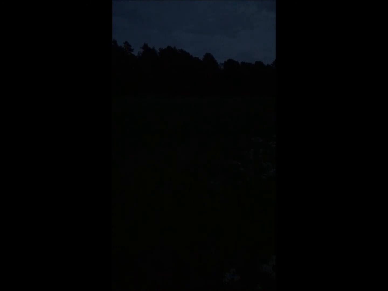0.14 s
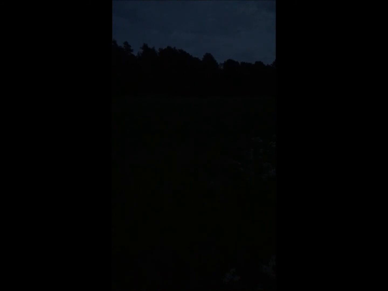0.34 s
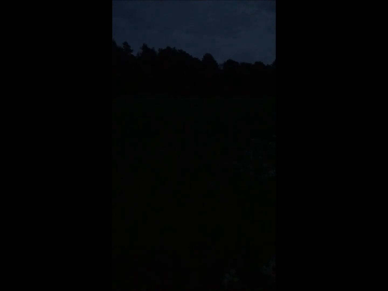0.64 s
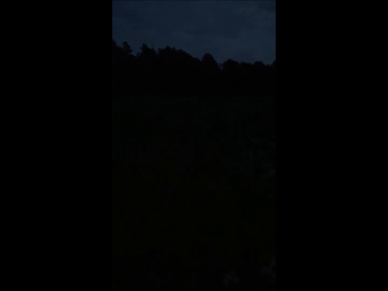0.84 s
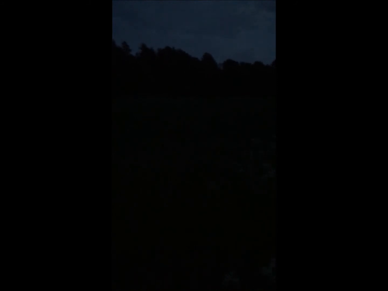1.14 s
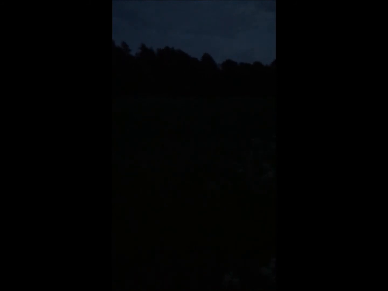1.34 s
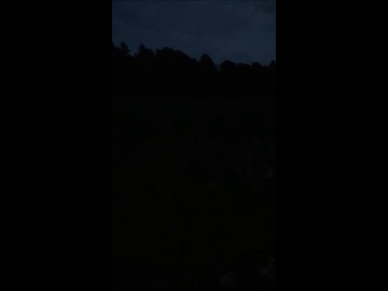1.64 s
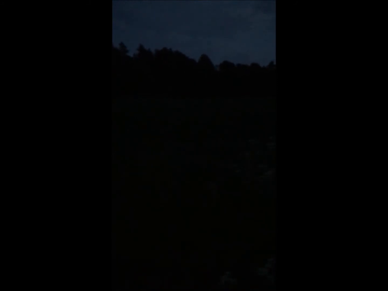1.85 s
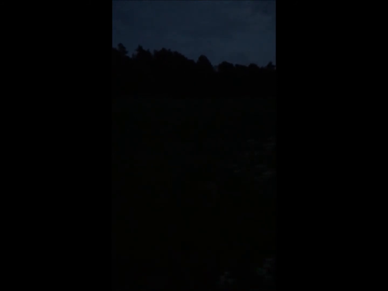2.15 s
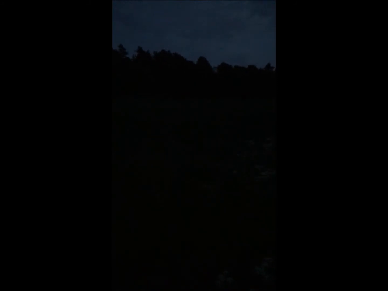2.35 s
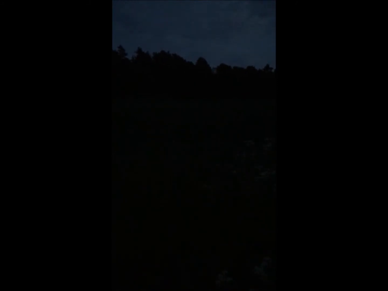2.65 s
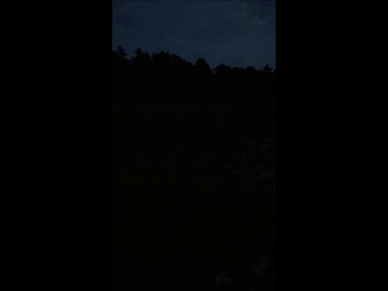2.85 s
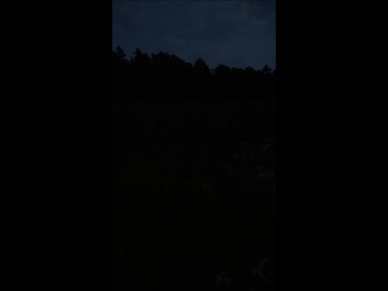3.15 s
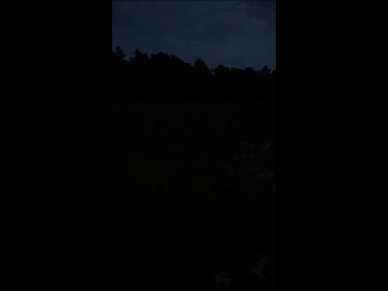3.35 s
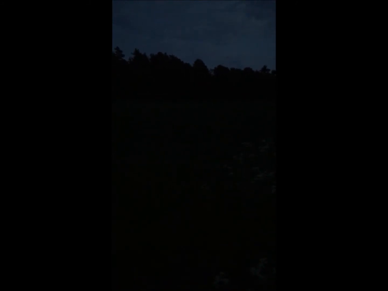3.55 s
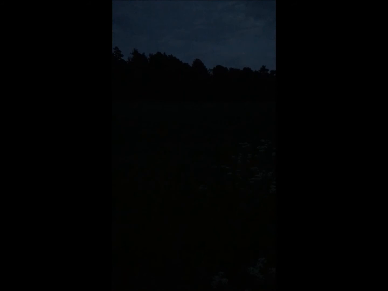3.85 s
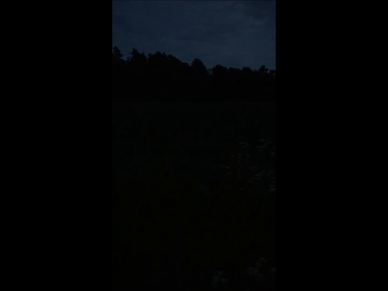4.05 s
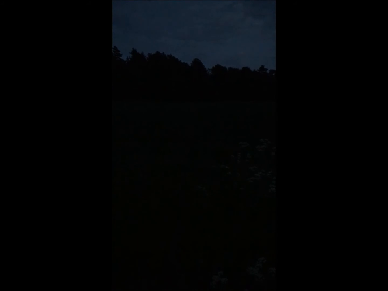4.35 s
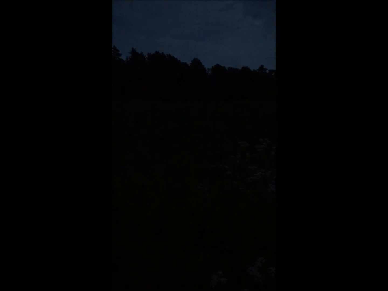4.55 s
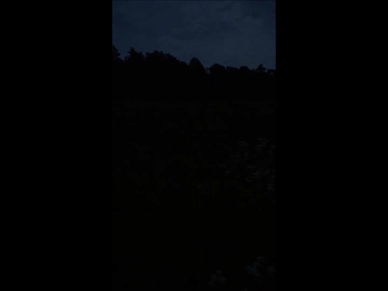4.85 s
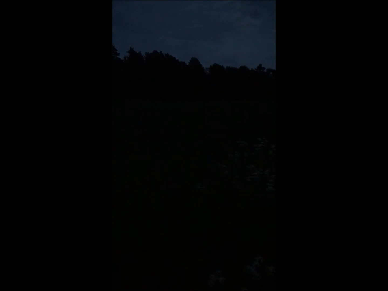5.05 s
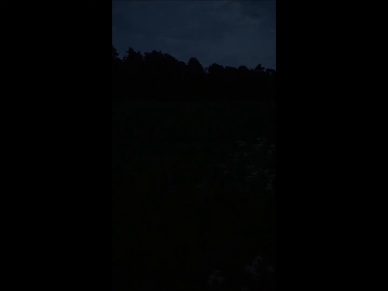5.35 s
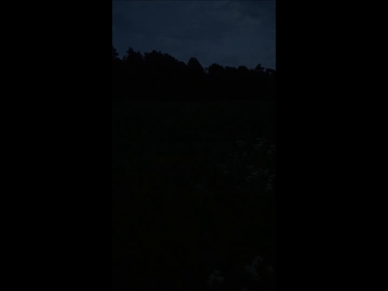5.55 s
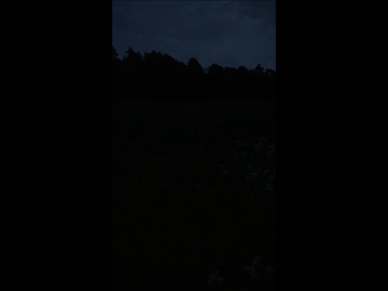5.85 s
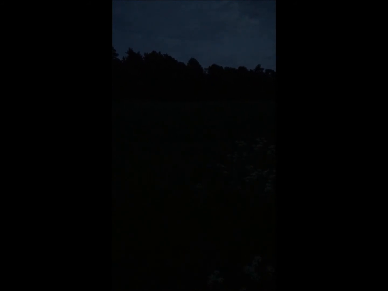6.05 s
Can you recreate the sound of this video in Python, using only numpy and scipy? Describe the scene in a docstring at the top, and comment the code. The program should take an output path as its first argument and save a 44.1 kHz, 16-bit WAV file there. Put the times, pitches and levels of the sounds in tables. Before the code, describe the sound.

A quail repeats its sharp, whipping three-note whistle across a quiet field at dusk, over a faint low drone, then falls silent.

```python
"""A low drone, as of far traffic, a fading rumble and steady quiet air lie under the whole scene.
A quail is ending a call as it opens; four more follow, each of three whistles that swell and flick upward.
Each whistle is a gliding tone with fluttering overtones; grass scatters it as dying clouds of reflections.
A bush and the forest edge return faint delayed copies or single notes. In the full calls a low two-tone
slur opens each note, and a soft rasp, noise through a falling resonance, links the last two."""
import sys
import numpy as np
from scipy import signal
from scipy.fft import rfft, irfft, next_fast_len
from scipy.io import wavfile

SR = 44100
rng = np.random.default_rng(int(sys.argv[2]) if len(sys.argv) > 2 else 0)


def to_wav(s):
    """Save 16-bit WAV."""
    ch = np.atleast_2d(s).T  # columns
    pcm = np.round(np.clip(ch, -1, 1) * 32767)  # PCM
    wavfile.write(sys.argv[1], SR, pcm.astype(np.int16))


N = 273683
TIME = np.arange(N) / SR
TOP_HZ = 15850  # band limit

# Pitch of the far drone. Each row: time in seconds, frequency in Hz.
DRONE_PITCH = [(0, 40.42), (1.4, 40.06), (2.4, 40.95), (3.2, 47.58), (4, 47.55), (4.7, 44.23), (5.5, 44.66),
               (6.2, 45.05)]
# The three notes of every call. Each row: lead-in in seconds, resting pitch in Hz, swell in dB per second,
# share of the call's crescendo still to come (0 to 1).
SYLLABLES = [(.0235, 1885, 960, 1.0), (.030, 1860, 1040, .3), (.037, 1890, 700, 0.0)]

# Where each sound begins and ends around its main moment, in seconds; a note's main moment is its flick.
NOTE_SPAN, SLUR_SPAN, RASP_SPAN = (-.04, .0035), (-.012, .012), (-.055, .045)
FOOT_HZ = 1337  # low pitch from which a note climbs


def amp(db):
    """Decibels as an amplitude ratio."""
    return 10 ** (np.asarray(db) / 20)


def unit(x):
    """Scale to an rms of 1."""
    return x / np.sqrt(np.mean(x ** 2) + 1e-20)


def curve(rows, at):
    """Piecewise-linear course of a quantity in time."""
    seconds, values = np.transpose(rows)
    return np.interp(at, seconds, values)


def along(points, hz):
    """Spectral envelope: (Hz, value) points joined by lines on a logarithmic frequency axis."""
    f, v = np.transpose(points)
    return np.interp(np.log(hz + 1), np.log(f), v)


def filtered(x, response):
    """Linear filtering: the spectrum times a response of frequency."""
    m = next_fast_len(len(x) + 8192)
    spectrum = rfft(x, m) * response(np.fft.rfftfreq(m, 1 / SR))
    return irfft(spectrum, m)[:len(x)]


def noise(spectrum, size):
    """White noise coloured by a spectral envelope, with an rms of 1."""
    return unit(filtered(rng.standard_normal(size), lambda f: amp(along(spectrum, f))))


def turning(hz):
    """Phase in radians: the running integral of a frequency."""
    return 2 * np.pi * np.cumsum(hz) / SR


def narrow(hz, width_hz):
    """A resonance excited by noise: slow random quadrature modulation of a carrier at hz, with an rms of 1."""
    def slow():
        # half amplitude at half the width on either side of the carrier
        return filtered(rng.standard_normal(len(hz)), lambda f: 1 / (1 + (2 * f / width_hz) ** 2))

    phase = turning(hz)
    return unit(slow() * np.cos(phase) + slow() * np.sin(phase))


def clock(start_s, end_s):
    """Sample times around a sound's main moment."""
    return np.arange(start_s, end_s, 1 / SR)


def swell(t, rise_db_per_s, fall_db_per_s):
    """Exponential growth to a gain of 1 at t = 0, then exponential decay."""
    return amp(np.minimum(rise_db_per_s * t, -fall_db_per_s * t))


def add(track, s, sound):
    """Superposition: mix a sound in from time s."""
    at = round(s * SR) + np.arange(len(sound))
    inside = (at >= 0) & (at < N)
    track[at[inside]] += sound[inside]


def far_drone(between_db=-11, waver=.45):
    """A tone beating irregularly with narrow noise at its own pitch, and a weaker line halfway to its octave."""
    # Level of the drone, rising overall. Each row: time in seconds, level in dB.
    drone_level = [(0, -65.5), (2, -60), (3.3, -56), (4, -60.5), (4.7, -54), (6.2, -52)]
    hz = curve(DRONE_PITCH, TIME)
    tone = np.sin(turning(hz))
    between = amp(between_db) * narrow(hz * 1.5, width_hz=7.7)
    wavering = waver * narrow(hz, width_hz=11)
    return amp(curve(drone_level, TIME)) * unit(tone + between + wavering)


def low_rumble(start_db=-58, fade_db_per_s=0.86, octave_db=-9):
    """Broadband low noise with a narrow band at the drone's octave, both decaying exponentially."""
    # Spectrum of the rumble. Each row: frequency in Hz, relative level in dB per Hz.
    rumble_spectrum = [(35, -23), (48, -2.5), (57, -2.5), (68, 2), (85, -3), (105, -8), (160, -14.5),
                       (250, -25.5), (600, -45)]
    octave = amp(octave_db) * narrow(2 * curve(DRONE_PITCH, TIME), width_hz=5.7)
    return amp(start_db - fade_db_per_s * TIME) * (noise(rumble_spectrum, N) + octave)


def quiet_air(level_db=-65):
    """Stationary noise with a fixed spectral envelope."""
    # Spectrum of the air. Each row: frequency in Hz, relative level in dB per Hz.
    air_spectrum = [(250, -5.5), (370, -4.5), (470, -7.5), (600, -4.5), (850, -8), (1300, -15), (2200, -21),
                    (4500, -28.5), (6500, -27), (9200, -26), (10500, -26.5), (11800, -21.5), (13400, -21),
                    (14000, -18), (14600, -21), (15800, -21)]
    return amp(level_db) * noise(air_spectrum, N)


def whip(peak_db, lead_s, rest_hz, swell_db_per_s):
    """Frequency modulation of a harmonic series: it climbs, rests near one pitch, shoots up and is cut off."""
    # Overtones against the fundamental. Each row: frequency in Hz, relative level in dB.
    overtone_levels = [(2700, -17.5), (3700, -28), (4800, -38.5), (5700, -56.5), (6500, -26.5), (7300, -48),
                       (9200, -35.5), (10400, -62.5), (13500, -58), (15200, -38.5)]
    t = clock(*NOTE_SPAN)

    # pitch: the climb ends on the rest, and the flick starts in the last moments before t = 0
    climb_s, rest_s, flick_s, flick_hz, flick_power = .0052, .0128, 0.0096, 1281, 3.335
    low = 1 - np.exp(np.minimum(t + rest_s, 0) / climb_s)  # near 1 at the foot, 0 on the rest
    climb = rest_hz + (FOOT_HZ - rest_hz) * low
    flick = flick_hz * np.maximum(1 + t / flick_s, 0) ** flick_power
    hz = climb + flick
    phase = turning(hz)

    # level: full from full_s before the flick to hold_s after it
    foot_db, full_s, hold_s, cut_db_per_s = -15, 0.001278, 0.00047, 11499
    push_db, push_ahead_s, push_width_s = 5.5, .0158, .002  # the voice pushes near the top of the climb
    push = push_db * np.exp(-((t + push_ahead_s) / push_width_s) ** 2)
    rise = swell_db_per_s * np.minimum(t + full_s, 0)
    cut = cut_db_per_s * np.maximum(t - hold_s, 0)
    db = foot_db * low + push + rise - cut

    overtones = np.zeros(len(t))
    for k in range(2, 10):
        level_db = along(overtone_levels, k * hz) - 0.65 * (k - 2)
        overtones += amp(level_db) * (k * hz < TOP_HZ) * np.sin(k * phase)
    flutter = 1 + .6 * narrow(np.zeros(len(t)), width_hz=750)
    effort = amp(.7 * (peak_db + 16))  # a louder note is also brighter
    buzz = amp(.5 * db) * effort * flutter * overtones  # it swells less than the whistle

    opening_s = .006  # the throat opens over this time
    opening = np.clip((t + lead_s) / opening_s, 0, 1)
    return opening * amp(peak_db) * (amp(db) * np.sin(phase) + buzz)


def scatter(x, delay_s, t60_s, db):
    """Multiple scattering: an exponentially dying cloud of reflections; thin stalks return more treble."""
    # What the grass scatters. Each row: frequency in Hz, relative level in dB.
    grass_response = [(500, -5.5), (1900, 0), (3500, 0), (5000, 13.5), (7000, 5), (16000, 16)]
    t = TIME[:SR // 2]
    cloud = rng.standard_normal(len(t)) * amp(-60 * t / t60_s) * (t >= delay_s)
    wet = signal.fftconvolve(x, cloud / np.linalg.norm(cloud))[:N]
    return amp(db) * filtered(wet, lambda f: amp(along(grass_response, f)))


def bush_echo(song, delay_s=.106, db=-47.5):
    """Discrete reflection: a delayed, weakened copy of the whole song."""
    back = np.zeros(N)
    add(back, delay_s, amp(db) * song)
    return back


def forest_edge():
    """Distant reflection: only a call's last, loudest note carries back, faint and dull."""
    # Echoes from the forest edge. Each row: time of the flick in seconds, peak level in dB.
    edge_echoes = [(0.303, -63.5), (1.354, -63.5), (1.459, -64), (2.537, -66.5)]
    lead_s, rest_hz, swell_db_per_s, _ = SYLLABLES[-1]
    back = np.zeros(N)
    for flick_s, db in edge_echoes:
        add(back, flick_s + NOTE_SPAN[0], whip(db, lead_s, rest_hz, swell_db_per_s))
    return back


def slur(middle_hz=967.6, glide_hz_per_s=22000, middle_db=-36.5, fade_db_per_s=1199.5, foot_db=-5):
    """Two-tone onset: the voice glides up from low and soft while the foot tone already stirs."""
    t = clock(*SLUR_SPAN)
    glide = np.sin(turning(middle_hz + glide_hz_per_s * t))
    foot = amp(foot_db) * np.sin(2 * np.pi * FOOT_HZ * t)
    return amp(middle_db - fade_db_per_s * np.abs(t)) * (glide + foot)


def rasp(top_hz=3916, bottom_hz=918.7, throat_hz=875):
    """Turbulent air through a falling resonance over a fixed throat hum; the hiss peaks first, the hum last."""
    # Spectrum of the hiss. Each row: frequency in Hz, relative level in dB per Hz.
    hiss_spectrum = [(550, -26.5), (850, -8.5), (1300, -1), (2200, 1.5), (3600, -3.5), (4200, -14),
                     (5100, -26.5), (6800, -29), (8000, -41), (16000, -48)]
    t = clock(*RASP_SPAN)
    fall = np.sin(np.pi / 2 * np.linspace(0, 1, len(t)) ** 1.2) ** 2  # the power makes it linger at the top
    hz = top_hz + (bottom_hz - top_hz) * fall
    sweep = swell(t, rise_db_per_s=478.5, fall_db_per_s=436.5) * narrow(hz, width_hz=720)
    hum = narrow(np.full(len(t), throat_hz), width_hz=214)
    hum *= swell(t - 0.019, rise_db_per_s=129, fall_db_per_s=348)
    hiss = swell(t + 0.013, rise_db_per_s=183.5, fall_db_per_s=285) * noise(hiss_spectrum, len(t))
    return sweep + amp(-10) * hum + amp(-10.5) * hiss


def quail():
    """Vocal effort rises through three notes a call; a slur opens each and a rasp precedes the last."""
    # The calls, the first already under way. Each row: time of the first flick in seconds, seconds to the
    # second, seconds on to the third, peak level in dB, crescendo in dB.
    calls = [(-0.357, .2235, .1442, -19.3, 3.5), (0.6931, .2229, .1449, -20.2, 4),
             (1.7748, .2233, .1427, -18.4, 4.2), (2.7731, .2264, .1451, -16, 1.8),
             (4.0045, .2179, .1436, -18.3, 3.3)]
    rasp_ahead_s = .0695  # from the rasp's peak to the third flick
    song = np.zeros(N)
    for s, pause_s, link_s, peak_db, crescendo_db in calls:
        flicks = s + np.cumsum([0, pause_s, link_s])
        for flick, (lead_s, rest_hz, swell_db_per_s, to_come) in zip(flicks, SYLLABLES):
            db = peak_db - to_come * crescendo_db
            add(song, flick - lead_s + SLUR_SPAN[0], amp(db) * slur())
            add(song, flick + NOTE_SPAN[0], whip(db, lead_s, rest_hz, swell_db_per_s))
        rasp_db = -34 + .5 * peak_db  # it grows half as much in dB as the call
        add(song, flicks[-1] - rasp_ahead_s + RASP_SPAN[0], amp(rasp_db) * rasp())
    return song


def scene():
    """Superposition of the bird, its echoes, their scattering near and far, and the background."""
    background = far_drone() + low_rumble() + quiet_air()
    song = quail()
    bird = song + bush_echo(song) + forest_edge()
    # levels before the treble lift of the grass
    stalks = scatter(bird, delay_s=0.00076, t60_s=.026, db=-14.5)
    meadow = scatter(bird, delay_s=0.0087, t60_s=0.11, db=-19.0)
    field = scatter(bird, delay_s=0.033, t60_s=0.22, db=-38.0)
    return (bird + stalks + meadow + field + background)[None]


def record(dry):
    """Band limiting: nothing is kept at or above the top frequency."""
    return np.array([filtered(channel, lambda hz: hz < TOP_HZ) for channel in dry])


dry = scene()
out = record(dry)
to_wav(out)
```